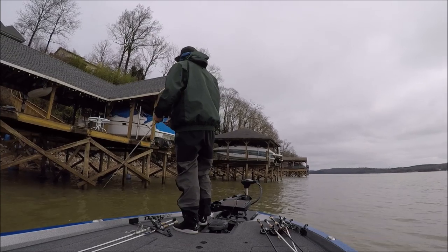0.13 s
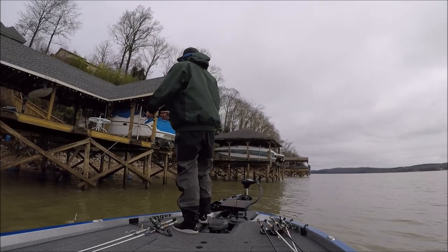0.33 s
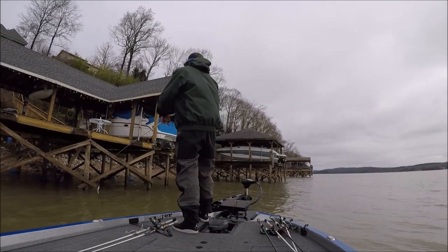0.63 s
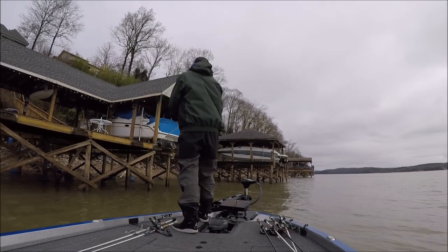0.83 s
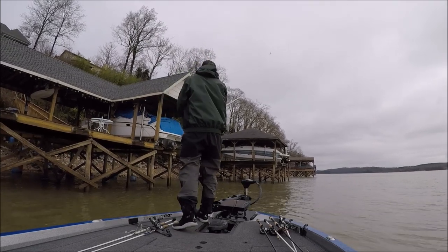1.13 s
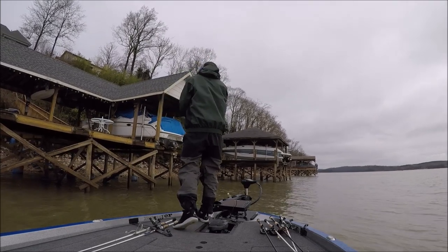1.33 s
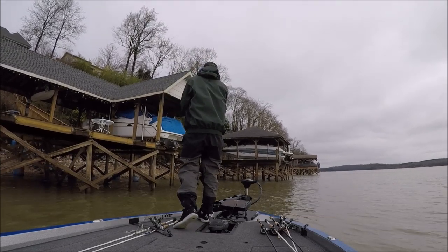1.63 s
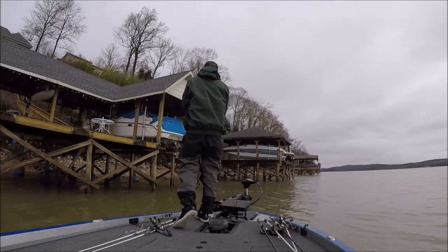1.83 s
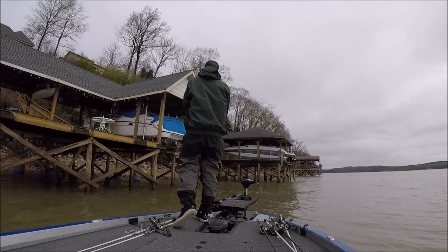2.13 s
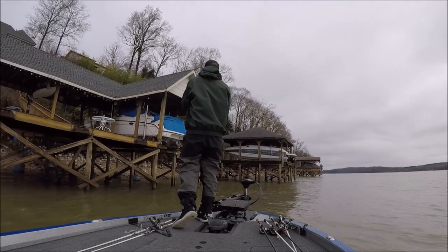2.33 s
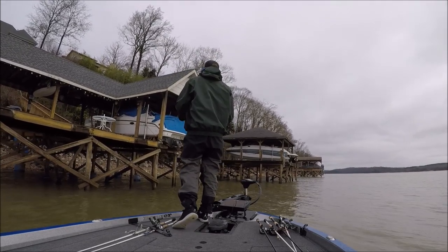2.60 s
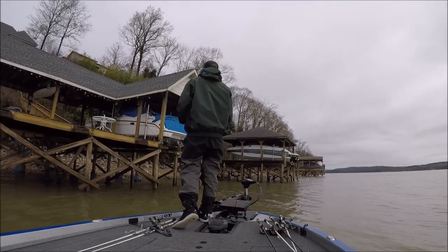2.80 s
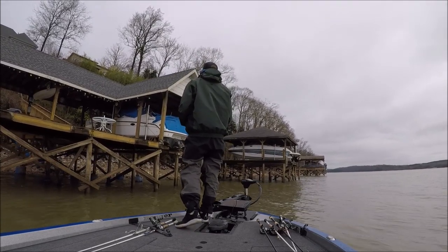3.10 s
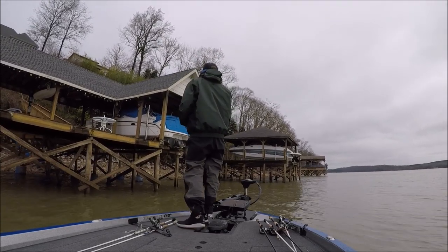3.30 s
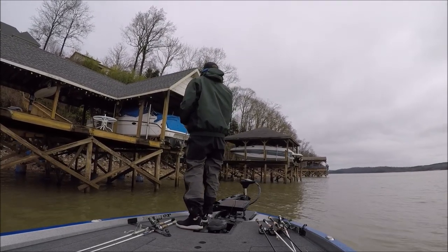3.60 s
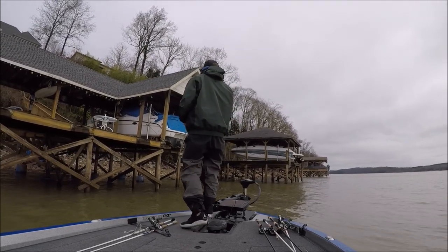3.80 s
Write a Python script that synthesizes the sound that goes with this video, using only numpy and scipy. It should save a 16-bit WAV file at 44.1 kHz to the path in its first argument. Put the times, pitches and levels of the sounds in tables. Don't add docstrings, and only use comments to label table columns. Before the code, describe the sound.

Water slaps a boat hull irregularly throughout, each blow a dull hollow boom with a wet slosh. A sharp slap comes at 0.1 s, clusters follow around 0.4-0.7, 1.2-1.7 and 2.1-2.5, then the heaviest thumps at 2.8 and 3.4. Low wind buffets the close microphone, swelling near 1.5 and 2.4. Faint lake hiss, bubbly splashes, tiny plinks, chirps and reel clicks, notably at 1.86 and 2.7, sit underneath.

```python
import sys
import numpy as np
from scipy import signal
from scipy.fft import rfft, irfft, next_fast_len
from scipy.io import wavfile
from scipy.ndimage import uniform_filter1d, minimum_filter1d, map_coordinates

SR = 44100
rng = np.random.default_rng(int(sys.argv[2]) if len(sys.argv) > 2 else 0)


def to_linear_factor(level_db):
    exponent = np.asarray(level_db, float) / 20
    return 10 ** exponent


def bounce(signal):
    frames = np.transpose(np.atleast_2d(signal))
    limited = np.clip(frames, -1, 1)
    pcm = np.round(limited * 32767).astype(np.int16)
    wavfile.write(sys.argv[1], SR, pcm)


N = 174195


def unit(x):
    return x / np.sqrt(np.mean(x ** 2) + 1e-20)


def along(points, hz):
    f, value = np.transpose(points)
    return np.interp(np.log(hz + 1), np.log(f + 1), value)


def curve(rows):
    return np.interp(np.arange(N) / SR, *np.transpose(rows))


def wobble(rate):
    knots = rng.standard_normal(int(N * rate / SR) + 4)
    return map_coordinates(knots, [np.arange(N) * rate / SR])


def filtered(x, response):
    n = x.shape[-1]
    size = next_fast_len(n + 8192)
    spectrum = rfft(x, size) * response(np.fft.rfftfreq(size, 1 / SR))
    return irfft(spectrum, size)[..., :n]


def modes(table):
    def response(f):
        total = 0
        for k, (center, width, db) in enumerate(table):
            resonance = 1j * f * width / (center * center - f * f + 1j * f * width)
            total = total + (-1) ** k * to_linear_factor(db) * resonance
        return total
    return response


def add(out, s, x):
    part = out[..., round(s * SR):][..., :x.shape[-1]]
    part += x[..., :part.shape[-1]]


def rush(spectrum, alike, patchy_db):
    z = signal.stft(rng.standard_normal((2, N)), nperseg=512)[2]
    patches = uniform_filter1d(rng.standard_normal(z.shape[1:]), size=6, axis=0)
    patches = uniform_filter1d(patches, size=12, axis=1)
    pair = signal.istft(z * to_linear_factor(patchy_db * unit(patches)), nperseg=512)[1][:, :N]

    def color_and_width(hz):
        side = np.tan(np.arccos(np.clip(along(alike, hz), -.9, 1)) / 2)
        return to_linear_factor(along(spectrum, hz)) * [np.ones_like(hz), side]
    mid, side = filtered(pair, color_and_width)
    return np.array([mid + side, mid - side]) / np.std(mid)


# start_s, boom_db, body_db, slap_db
SLAPS = [(0.136, -12, -18, -17), (0.363, -22.5, -34, -42), (0.437, -12, -33.5, -37),
         (0.492, -21.5, -51, -46.1), (0.539, -30, -28.5, -29), (0.665, -20.5, -25.5, -30),
         (0.731, -25, -45, -49), (1.166, -12, -19.3, -21.5), (1.39, -19, -24, -32),
         (1.526, -14, -28, -42.1), (1.585, -18.5, -36, -48.9), (1.652, -31, -37, -43.5),
         (1.714, -33, -45, -52), (1.855, -39, -35, -24.9), (2.074, -17, -14, -29),
         (2.226, -24.5, -32, -42), (2.298, -34, -38, -47.8), (2.415, -17, -23, -23.5),
         (2.502, -26, -16.5, -25.5), (2.684, -40.1, -30.5, -35), (2.772, -6.5, -6.5, -17.5),
         (3.107, -21, -27, -38), (3.19, -24, -35, -47), (3.255, -21, -34, -36), (3.4, -6, -6, -15),
         (3.486, -16, -30, -44), (3.58, -30, -40, -52.1), (3.714, -26, -40, -40.9),
         (3.764, -30.5, -32.5, -43.7), (3.889, -45, -32.5, -55),
         (.221, -22.5, -26.5, -34), (.631, -21, -26, -28), (1.241, -22.5, -25, -43),
           (1.372, -18, -24.5, -28.5), (2.127, -26, -31.5, -34), (2.196, -29, -38, -37),
           (2.446, -28.5, -25, -36), (2.846, -17.5, -30, -40), (2.921, -32, -38, -45),
           (3.356, -18.5, -42, -49), (3.43, -7.5, -25.5, -46), (1.204, -15, -22.5, -36)]
# pitch_hz, width_hz, level_db
BOOM = [(83, 9, -10), (121, 7, 0), (135, 7, 0), (158, 16, -11)]
BODY = [(185, 16, -8), (205, 8, 1), (228, 12, -4), (247, 10, 0), (271, 4, 3), (298, 14, -1), (325, 18, -8)]
SLAP = [(352, 30, -8), (395, 40, -4), (455, 36, 0), (495, 36, -5), (600, 80, -14), (710, 70, -11),
        (950, 200, -27)]
# push_rise_s, push_fall_s, lag_s, left_right_db, lapping_db, air_share (0-1)
GROUPS = [
    (.01, .018, -.004, -13, -49, 0.084),
    (.014, .018, -.008, -3.2, -52.5, 0.06),
    (.012, .02, -.01, -1, -61, 0.12),
]
GROUP_TRIM = [0, 1.5, 0]
BLOW = .9


def hull():
    out, t = np.zeros((2, N)), np.arange(SR // 2) / SR
    hits = np.array(SLAPS)
    for k, (group, settings) in enumerate(zip((BOOM, BODY, SLAP), GROUPS)):
        rise, fall, lag, left_right_db, lapping_db, air_share = settings

        def soft(f):
            low_cut = f / (1j * f + .6 * group[0][0])
            return modes(group)(f) * (low_cut / (1 + 1j * f / (1.5 * group[-1][0]))) ** 2
        shape = np.where(t < rise, (t / rise) ** 2, np.exp(-(t - rise) / fall))
        push = shape * rng.standard_normal((len(hits), 2, len(t)))
        direction = rng.choice([-1, 1], len(hits))
        push[:, 0, round(rise * SR)] += BLOW * np.sqrt(fall * SR / 2) * direction
        ring = filtered(push, soft)
        power = uniform_filter1d(ring[:, 0] ** 2, size=1100, axis=1)
        ring /= np.sqrt(2 * power.max(axis=1))[:, None, None]
        lapping = unit(filtered(rng.standard_normal((2, N)), soft))
        sound = to_linear_factor(lapping_db + 5.4 * wobble(7.3)) * lapping
        for hit, x in zip(hits, ring):
            add(sound, hit[0] + lag, to_linear_factor(hit[k + 1] + GROUP_TRIM[k]) * x)
        left = to_linear_factor(left_right_db)
        shaken = np.outer([left, -1], sound[0]) * 2 / (1 + left)
        out += shaken + air_share * sound[1]
    return out


# time_s, level_db
WIND = [(0, -24.5), (.75, -24.5), (.87, -29), (1.15, -25.5), (1.45, -20.5), (2.15, -22), (2.27, -28.5),
        (2.38, -17), (2.55, -20.5), (2.8, -24), (3.1, -26.5), (3.5, -29.5), (3.9, -23)]
# pitch_hz, level_db (per Hz)
RUMBLE = [(15, -5.5), (28, 2), (60, -2), (90, -2.5), (130, -19.5), (250, -29.5), (500, -42), (900, -96)]
# pitch_hz, likeness (1 = same)
RUMBLE_ALIKE = [(30, 0.73), (100, 0.53)]


def wind():
    lumps = to_linear_factor(3 * np.array([wobble(8.4), wobble(7.895)]))
    x = lumps * rush(RUMBLE, RUMBLE_ALIKE, patchy_db=-1.5)
    return to_linear_factor(curve(WIND)) * x / np.std(x.mean(axis=0))


# time_s, level_db
LAKE = [(0, -55), (.35, -51), (.7, -55), (1.2, -53), (1.4, -50), (1.65, -54), (2.75, -52), (3.3, -56.5),
        (3.45, -56.5), (3.95, -57.5)]
# pitch_hz, level_db (per Hz)
HISS = [(290, -40), (500, -29), (529, -8.5), (645, -4), (1170, -8), (2160, -8.5), (2520, -13),
        (7520, -16.5), (14800, -27)]
# pitch_hz, likeness (1 = same)
HISS_ALIKE = [(600, 0), (1400, 0), (3000, 0.45), (4300, 0.64), (6500, 0), (14000, 0.067)]
HISS_DB = 2.5


def lake():
    level_db = curve(LAKE) + HISS_DB + 0.9 * wobble(9.1)
    return to_linear_factor(level_db) * rush(HISS, HISS_ALIKE, patchy_db=2.0)


# pitch_hz, level_db
WHINE = [(3677, -75), (5000, -75), (8000, -82), (9000, -84), (10000, -87)]


def whine():
    t = np.arange(N) / SR
    return sum(to_linear_factor(db) * np.sin(2 * np.pi * hz * t) for hz, db in WHINE)


# start_s, peak_db, length_s,
# pitch_hz
SPLASHES = [(.29, -43, .06, 5700), (.537, -30, .04, 1050), (.645, -31, .045, 1150), (.685, -36, .02, 800),
            (.62, -41, .02, 1900), (1.168, -26, .09, 320), (1.36, -35, .04, 620), (1.865, -39, .06, 700),
            (2.066, -32, .04, 550), (2.19, -37, .05, 1200), (2.395, -30, .07, 800), (2.41, -23, .04, 250),
            (2.51, -10, .012, 80), (2.504, -29, .025, 360), (2.763, -15, .05, 240), (2.772, -33, .035, 720),
            (3.385, -36, .035, 2000), (3.39, -15, .04, 260), (3.63, -31, .05, 200),
            (3.385, -43, .035, 4200), (2.53, -41, .02, 1000), (3.385, -31, .04, 800), (1.17, -35, .04, 700)]
BUBBLE_CYCLES, BUBBLE_RISE = 2, .2
BUBBLE_OCTAVES, BUBBLE_DB, BUBBLE_WIDE = .4, 2.5, 1


def splashes(count=40):
    out = np.zeros((2, N))
    for s, db, length, hz in SPLASHES:
        t = np.arange(int((length + 3 * BUBBLE_CYCLES / hz) * SR)) / SR
        when, size, side = rng.random((3, count, 1))
        pitch = hz * 2 ** (BUBBLE_OCTAVES * rng.standard_normal((count, 1)))
        cycles = np.maximum(t - length * when ** 2, 0) * pitch
        fade = np.exp(-cycles / BUBBLE_CYCLES) * np.tanh(2 * cycles)
        tone = np.sin(2 * np.pi * cycles * (1 + BUBBLE_RISE * cycles / 10))
        bubbles = to_linear_factor(-BUBBLE_DB * np.log(size)) * fade * tone
        mid = bubbles.sum(axis=0)
        wide = (bubbles * (2 * side - 1)).sum(axis=0) * BUBBLE_WIDE
        burst = np.array([mid + wide, mid - wide]) * np.sqrt(1 - t / t[-1])
        add(out, s, to_linear_factor(db) * burst / np.abs(mid).max())
    return out


# start_s, length_s, from_hz, to_hz, level_db
TONES = [(.305, .05, 3850, 3730, -51), (.912, .022, 1220, 1290, -38.5), (1.813, .07, 3250, 3650, -54),
         (2.082, .036, 3870, 3790, -52), (2.716, .015, 1430, 1500, -41), (3.5, .04, 2000, 1600, -59),
         (3.318, .0042, 4250, 4150, -39), (3.361, .06, 570, 800, -39), (3.385, .062, 680, 1380, -43),
         (3.369, .02, 5270, 5170, -60), (3.2, .04, 2170, 2150, -58), (3.69, .045, 2280, 2970, -58),
         (3.775, .058, 2130, 1850, -62)]
TONE_ROUGH, TONE_RATE = 1.2, 280


def tones():
    out = np.zeros((2, N))
    for s, length, from_hz, to_hz, db in TONES:
        u = np.linspace(0, 1, int(length * SR))
        pitch = from_hz + (to_hz - from_hz) * u
        phase = 2 * np.pi * np.cumsum(pitch) / SR + TONE_ROUGH * wobble(TONE_RATE)[:len(u)]
        size = np.sin(np.pi * np.sqrt(u)) * (1 + TONE_ROUGH / 2 * wobble(TONE_RATE)[:len(u)])
        side = np.array([[1], [-1]]) * rng.uniform(0, 0.32)
        add(out, s, to_linear_factor(db) * size * np.sin(phase + side))
    return out


# start_s, peak_db, length_s, pitch_hz
CLICKS = [(0.828, -30.5, 0.007, 5000), (1.061, -36.5, 0.0044, 2380), (1.321, -40, 0.065, 10860),
          (1.729, -37.5, 0.032, 3500), (1.8581, -19, 0.0063, 1070), (2.727, -24, 0.012, 4000),
          (2.762, -38, 0.027, 4000), (3.079, -37, 0.0031, 4000), (3.144, -43.5, 0.058, 3000),
          (3.224, -40.5, 0.0036, 6500), (3.378, -46, 0.04, 4000)]
# pitch_hz, width_hz, level_db
REEL = [(730, 230, 12.5), (2960, 990, 3), (4000, 1140, 2), (5930, 1320, 0.5), (7900, 2650, -3),
        (12000, 3700, -33)]
CLICK_OCTAVES, CLICK_ALIKE = 1.64, 0.68
CLICK_TAIL, CLICK_TAIL_S = .08, .02


def clicks():
    out, t = np.zeros((2, N)), np.arange(SR // 8) / SR
    for s, db, length, hz in CLICKS:
        fade = np.exp(-(t / length) ** 3) + CLICK_TAIL * np.exp(-t / CLICK_TAIL_S)
        shape = np.minimum(t / (0.17 * length), 1) * fade
        mid, side = shape * rng.standard_normal((2, len(t)))
        pair = np.array([mid + CLICK_ALIKE * side, mid - CLICK_ALIKE * side])

        def tint(f):
            octaves = np.log2(f / hz + 1e-6)
            return modes(REEL)(f) * np.exp(-.5 * (octaves / CLICK_OCTAVES) ** 2)
        x = filtered(pair, tint)
        add(out, s, to_linear_factor(db) * x / np.abs(x.mean(axis=0)).max())
    return out


def scene():
    return hull() + wind() + lake() + whine() + splashes() + tones() + clicks()


def roll_off(x):
    return signal.sosfilt(signal.butter(12, 14500, fs=SR, output="sos"), x)


MIC_TOP_HZ = 10640
TOP_PATCH_HZ, TOP_PATCH_DB, TOP_PATCH_RATE = 11200, 6, 12
DUCK_FROM_DB, DUCK_SLOPE, DUCK_S = -11, .6, .2
CEILING = .9


def record(dry):
    dry = filtered(dry, lambda f: 1 / np.sqrt(1 + (f / MIC_TOP_HZ) ** 8))
    top = filtered(dry, lambda f: 1 / (1 + (TOP_PATCH_HZ / (f + 1)) ** 20))
    top_gain = to_linear_factor(TOP_PATCH_DB * np.minimum(wobble(TOP_PATCH_RATE), .5))
    dry = dry + top * (top_gain - 1)
    loudness = uniform_filter1d(np.abs(dry).max(axis=0), size=900)
    over = np.maximum(20 * np.log10(loudness + 1e-6) - DUCK_FROM_DB, 0)
    keep = np.exp(-1 / (DUCK_S * SR))
    held = signal.lfilter([1 - keep], [1, -keep], over) * 4
    x = dry * to_linear_factor(-DUCK_SLOPE * held)
    need = np.minimum(CEILING / (np.abs(x).max(axis=0) + 1e-9), 1)
    limit = uniform_filter1d(minimum_filter1d(need, size=1201), size=601)
    return roll_off(x * limit)


dry = scene()
out = record(dry)
bounce(out)
```